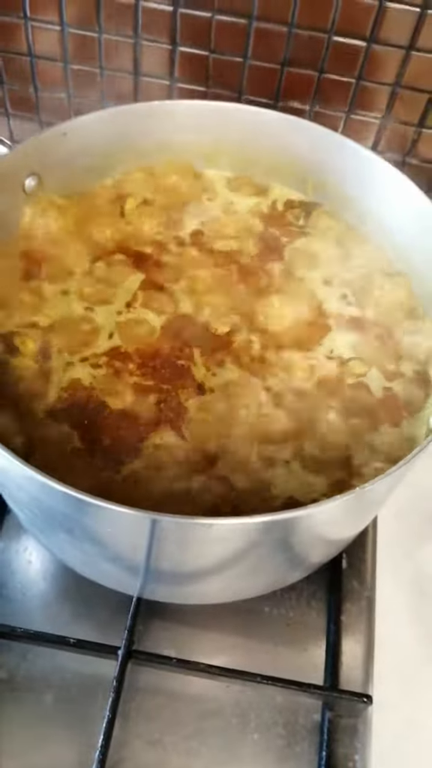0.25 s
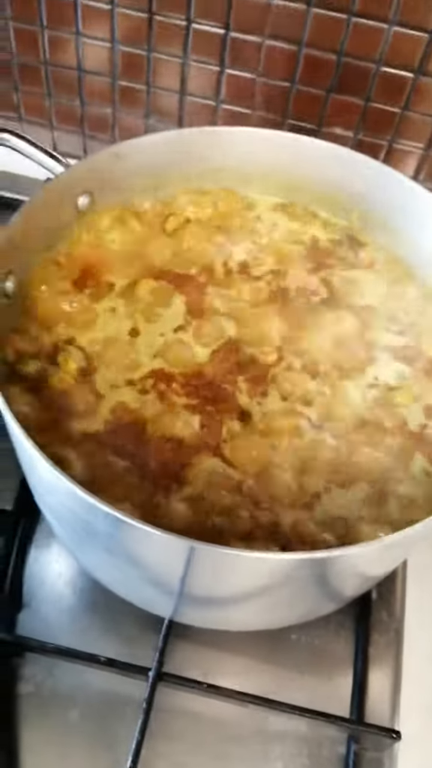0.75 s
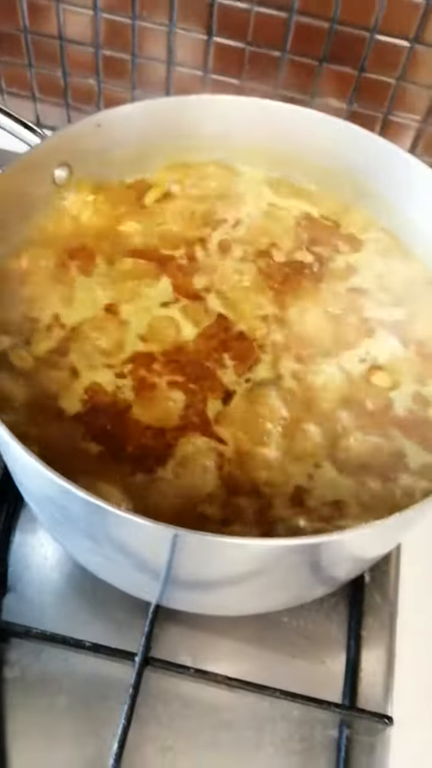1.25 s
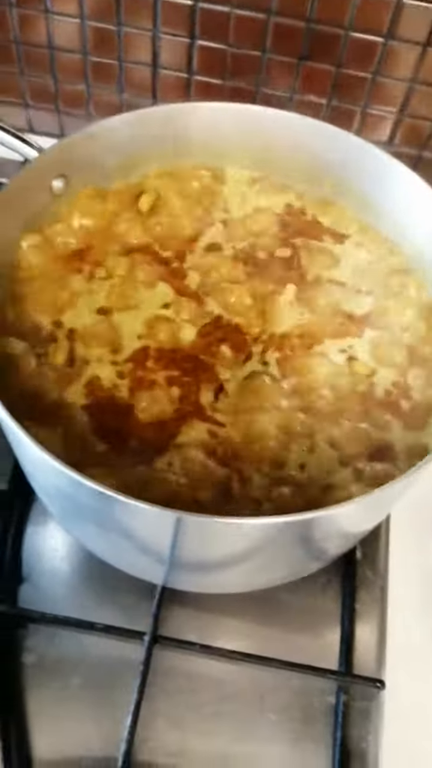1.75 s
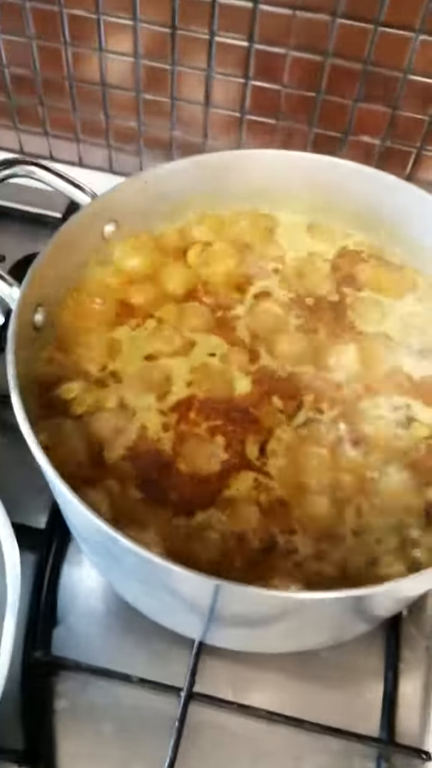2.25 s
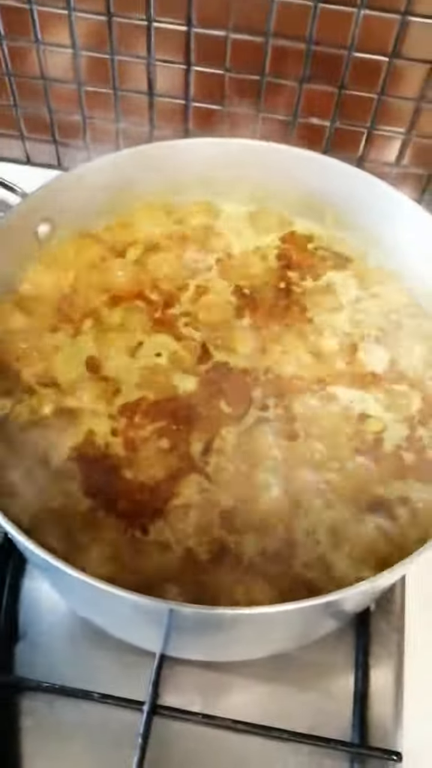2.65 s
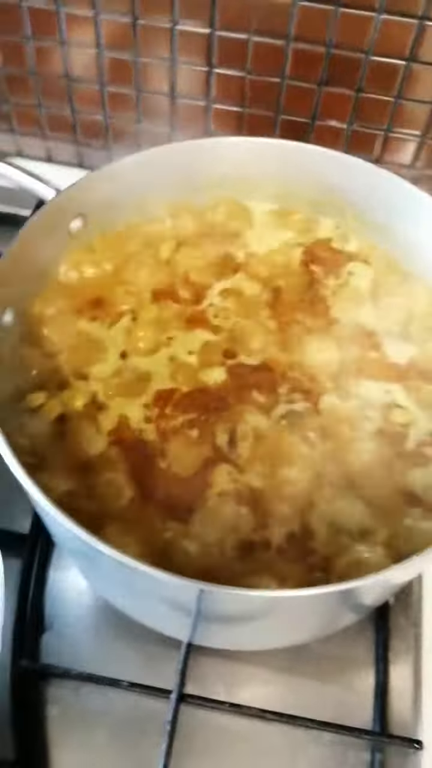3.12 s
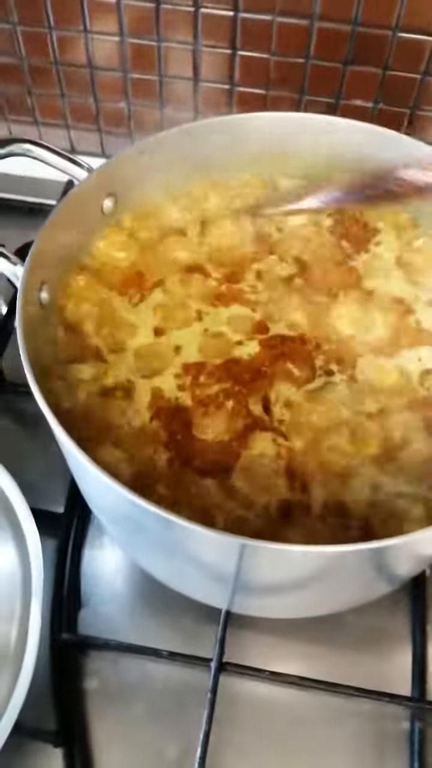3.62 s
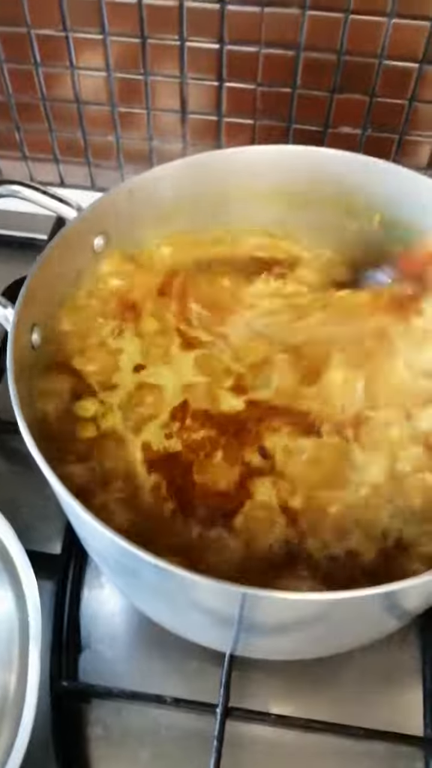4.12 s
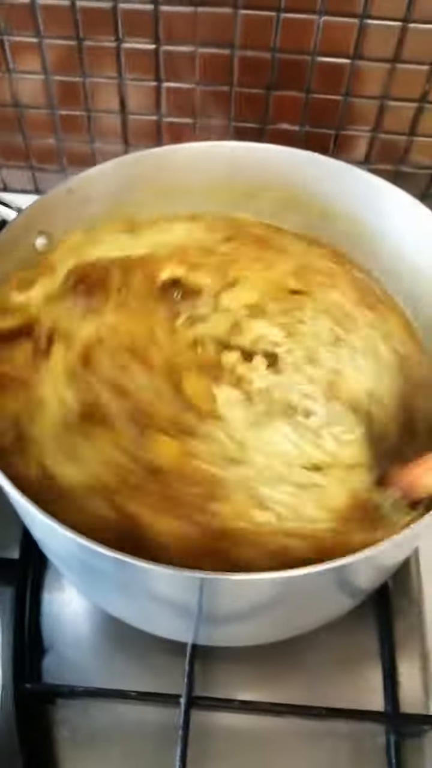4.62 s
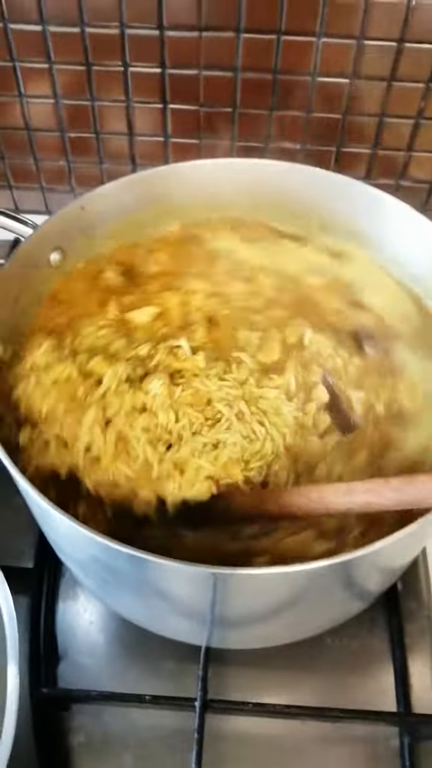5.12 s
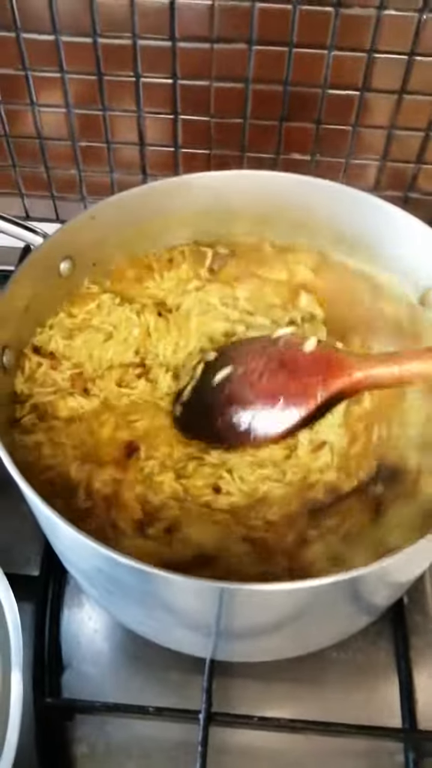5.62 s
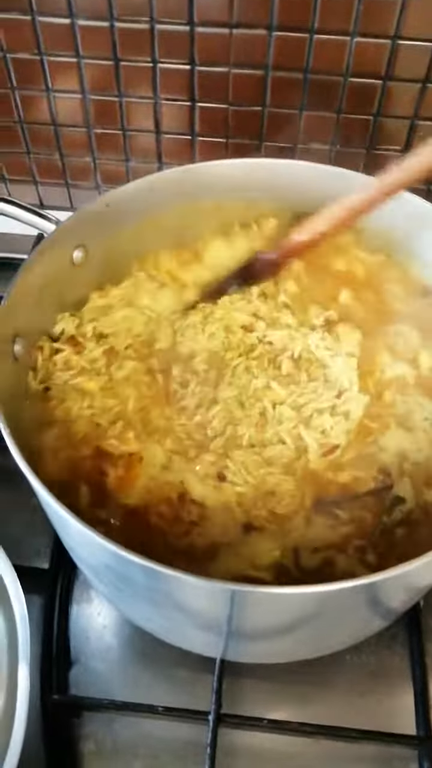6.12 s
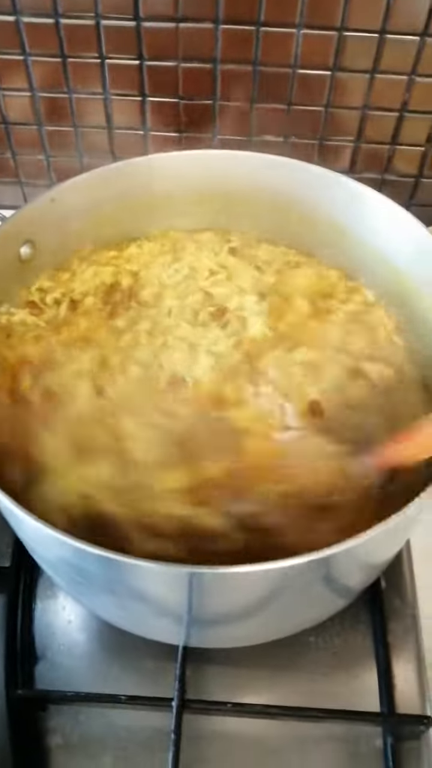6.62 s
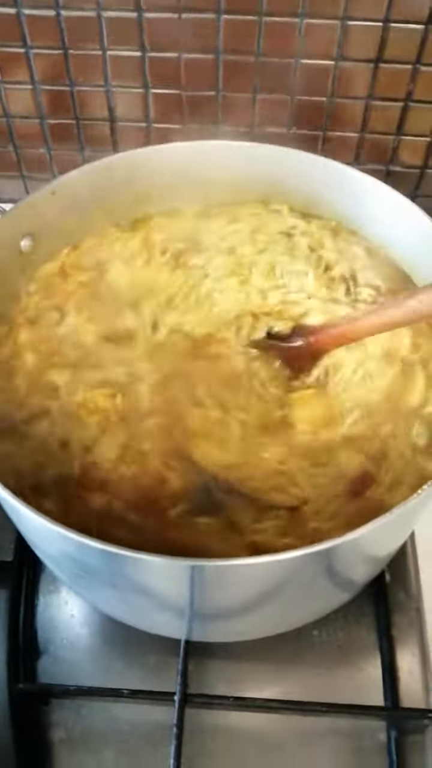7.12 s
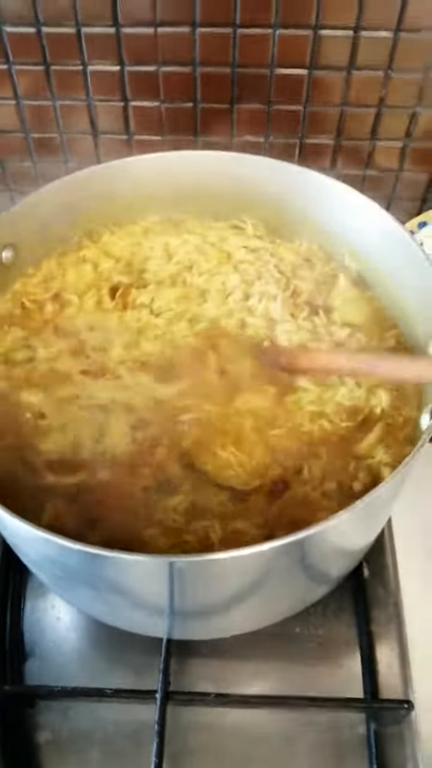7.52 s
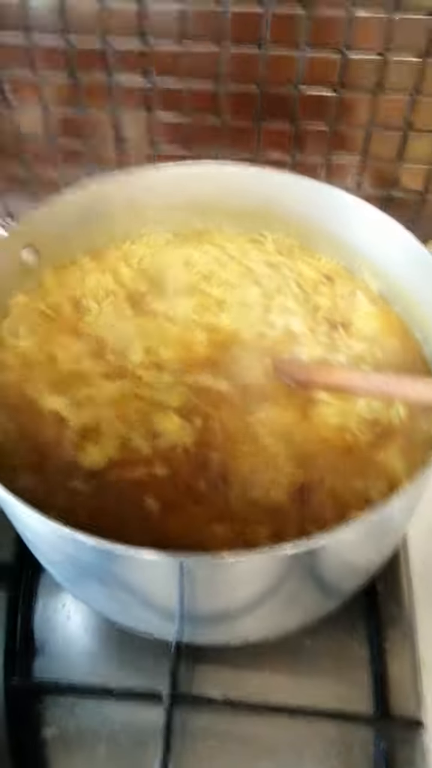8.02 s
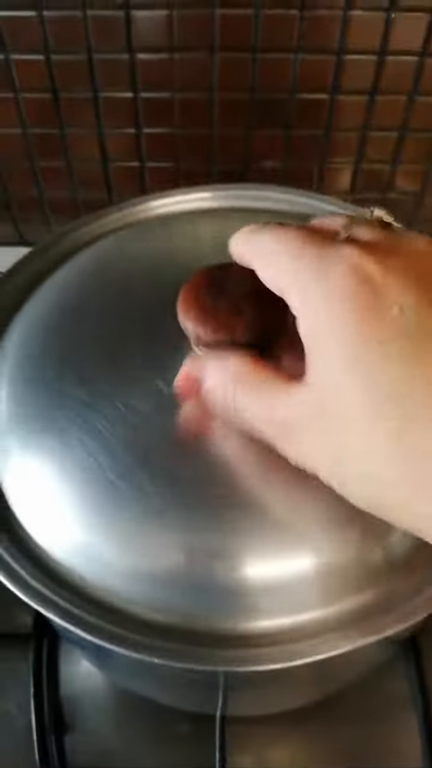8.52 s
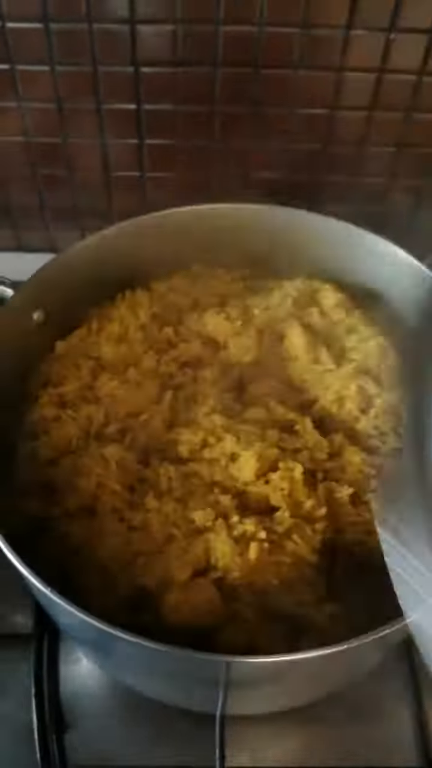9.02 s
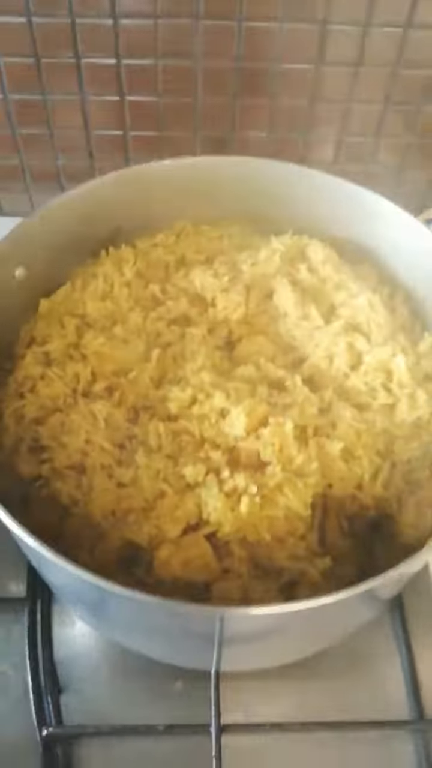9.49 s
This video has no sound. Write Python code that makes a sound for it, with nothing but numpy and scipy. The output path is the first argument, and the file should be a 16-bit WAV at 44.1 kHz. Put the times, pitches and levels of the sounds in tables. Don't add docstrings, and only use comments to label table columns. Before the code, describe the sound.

Close in a tiled kitchen, a pot of rice boils over a low flame rumble with bursting bubbles and bright fizz. An early sharp steel snap and ladle clinks give way to wooden spoon taps, scrapes and wet pops as the big bubbles calm. The sound cuts abruptly to a muffled covered simmer; a hand rattles the lid, lifts it ringing, and steam rushes out.

```python
import sys
import numpy as np
from scipy import signal
from scipy.fft import rfft, irfft, next_fast_len
from scipy.io import wavfile

SR = 44100
rng = np.random.default_rng(int(sys.argv[2]) if len(sys.argv) > 2 else 0)


def boost(x):
    u = np.asarray(x, float) / 20
    return 10 ** u


def output_pcm(signal):
    pcm = np.clip(np.atleast_2d(signal).T, -1, 1) * 32767
    wavfile.write(sys.argv[1], SR, np.round(pcm).astype(np.int16))


N = 429975
HZ = np.maximum(np.fft.rfftfreq(N, 1 / SR), 1)

SCENE_CHANGE_S, TILT_S, LIFT_S = 8.072, 8.6, 8.74

# f/Hz, level/dB per Hz
RUMBLE_SPECTRUM = [(12, -50), (20, -36), (54, 0.5), (108, -5.5), (141, 3.5), (177, -5), (208, -8),
                   (252, -15.5), (284, -1.5), (352, -7), (500, -17.5), (650, -49), (1100, -120)]
# f/Hz, level/dB per Hz
SEETHE_SPECTRUM = [(210, -79), (350, 7.5), (440, -13), (539, 7), (858, 2.5), (920, -5), (1040, 1),
                   (1220, -22), (1600, -12), (2080, -10.5), (3520, -120)]
# f/Hz, level/dB per Hz
FIZZ_SPECTRUM = [(590, -12), (1000, 3), (1730, -18.5), (2590, -4.5), (2870, -11.5), (3190, -8),
                 (3670, -15.5), (5700, -6.5), (6470, 2), (7530, -8), (8550, -20), (9170, -19.5),
                 (13500, -15.5), (14800, -11), (15600, -22)]
# f/Hz, width/Hz, boost/dB
FIZZ_RESONANCES = [(2660, 110, -1), (3150, 100, 5), (5240, 370, 6.5), (6410, 60, 8), (8480, 320, 16),
                   (9470, 400, 3), (10800, 770, 3.5), (12140, 300, 6), (14800, 330, 6)]
# f/Hz, level/dB per Hz
SIMMER_SPECTRUM = [(210, -7), (350, -11), (672, -12), (1120, -15), (1250, -18), (1650, -18.5),
                   (3160, -21.5), (3410, -29), (4500, -21), (5850, -42), (9900, -120)]
# f/Hz, level/dB per Hz
LEAK_SPECTRUM = [(1760, -53), (3000, -25), (3260, 3), (4230, -8), (5480, 3), (6390, -5), (16000, -18)]
# f/Hz, level/dB per Hz
STEAM_SPECTRUM = [(2060, -25), (3500, -13), (3850, -48), (4630, -11), (5860, -5), (6240, -10), (6700, -0.5),
                  (7510, -0.5), (10800, -10), (14700, -5.5), (16000, -9)]
# t/s, level/dB
REACH = [(0.0, -57), (0.43, -57.5), (0.9, -57.5), (1.0, -63.5), (1.2, -61.5), (1.57, -58), (2.0, -52),
         (4.2, -52), (8.06, -52)]
# t/s, left minus right/dB
BROTH_SIDE = [(0.0, 30), (0.62, 34), (0.87, 25), (2.52, -0.5), (2.96, 24), (3.88, 3.5), (8.88, -0.5),
              (9.75, -3)]
RUMBLE_DB, BUBBLE_DB, FIZZ_DB = -3.5, -5, 0
STIR_S, SETTLE_S, CALM_DB, RUMBLE_CALM_DB = 2.7, 3.1, -7, -4
LULL_DB = -4
COVERED_DB, LEAK_DB, FLAME_DB = -68.5, -66, -62
UNCOVERED_DB = 8
STEAM_DB, STEAM_RISE_S, STEAM_THINS_DB_PER_S = -52.5, 0.28, 7.5

# t/s, level/dB, brightness/dB per octave
CLINKS = [
    (0.0, -57, -0.5),
    (1.5415, -30, -7),
    (1.594, -29.5, -10.5),
    (1.623, -36.5, -1),
    (1.767, -37, -16),
    (1.700, -31.5, 2),
    (1.786, -35.5, -7),
]
# f/Hz, level/dB, t60/s
LADLE_MODES = [(2562, 0, .4), (2599, -1, .4), (2690, -16, .08), (3670, -17, .05), (5090, -21, .2),
               (6095, -6, .16), (6580, -2, .22), (6622, -3, .22), (7360, -22, .12), (7950, -13, .1),
               (8990, -10, .2), (9130, -16, .14), (10765, -5, .12), (13145, -12, .12), (14225, -9, .1),
               (14705, -21, .08)]
LADLE_LEAN_DB, LADLE_LAG_S = -5, -.00008
GRIP_S, GRIP_DB = 1.686, -18

# t/s, tap level/dB, tap f/Hz, snap level/dB
RAPS = [(0.069, -57.5, 1940, -68), (0.082, -60.5, 1580, -59.5), (0.8968, -51, 1650, -35.5),
        (1.541, -59, 1940, -45.5), (1.567, -53, 2800, -88), (1.626, -49.5, 2860, -81),
        (1.698, -53, 3650, -36.5), (2.01, -58, 2600, -49), (2.243, -47, 1850, -59), (2.32, -61, 1330, -79),
        (2.411, -47, 1300, -42), (2.4153, -47, 4760, -39.5), (2.557, -49, 1840, -84),
        (2.558, -44.5, 3000, -62), (2.566, -50, 2360, -83), (2.898, -57.5, 1710, -79),
        (7.535, -66, 2300, -88), (8.392, -50, 1630, -35), (8.404, -48, 1960, -34), (2.958, -62, 2500, -97),
        (8.613, -58, 1800, -54), (8.645, -63, 3300, -52),
        (3.93, -61.5, 1330, -71), (4.237, -59, 1340, -82), (4.883, -57, 2140, -59), (4.944, -58, 2520, -55),
        (5.18, -53, 1900, -56), (5.773, -51, 3060, -87), (5.892, -79, 2330, -55), (3.467, -53.5, 2570, -76),
        (6.381, -57.5, 1950, -55), (6.419, -56, 3150, -72), (6.506, -51.5, 2820, -62),
        (6.517, -53.5, 1130, -54), (6.628, -56, 2360, -58), (6.7, -61, 2800, -51),
        (6.809, -56.5, 2660, -92), (6.942, -52, 2800, -88), (7.484, -50, 2360, -84),
        (7.632, -85, 2460, -53), (7.75, -53.5, 2140, -55), (7.836, -57, 1930, -51),
        (7.869, -61, 3530, -49.5), (7.987, -67, 2400, -45)]
# pitch ratio/1, level/dB
SPOON_PARTIALS = [(.62, 2.5), (.8, -12), (1, 19.5), (1.06, 5), (1.27, 10.5), (1.6, 7.5), (2.1, -22)]
# f/Hz, level/dB
SNAP_PARTIALS = [(4700, -10), (5400, -4), (5900, -1), (6400, -3), (6850, 0), (7350, 0), (7900, -7),
                 (8500, -14), (9600, -22), (11200, -24), (13500, -25)]
SNAP_T60_S = .011

# t/s, level/dB, f/Hz
PLOPS = [(0.08, -52, 920), (0.163, -56.5, 786), (0.214, -46, 1085), (0.271, -69, 880), (0.326, -49.5, 810),
         (0.536, -54, 785), (0.588, -52.5, 830), (0.669, -51, 770), (1.379, -46.5, 900), (2.011, -43, 865),
         (2.32, -41, 710), (2.69, -47, 927), (2.862, -42.5, 630), (3.198, -54, 810), (4.271, -47, 1320),
         (4.946, -39.5, 900), (4.966, -43.5, 1050), (5.702, -55, 1050), (5.771, -45, 1090),
         (6.515, -58, 1090), (6.631, -50.5, 610), (7.072, -45.5, 890), (7.87, -46, 1110),
         (7.984, -46, 1090), (9.694, -45.5, 1180)]
# t/s, level/dB, f/Hz
THUMPS = [(0.8957, -53, 324), (1.542, -50, 424), (1.7, -47, 418), (2.412, -38, 540), (2.4151, -30.5, 806),
          (2.56, -39, 990), (2.92, -46.5, 170), (3.754, -35, 600), (3.79, -45, 586), (6.382, -46, 305),
          (7.483, -24.5, 306), (7.486, -29.5, 556), (7.535, -43, 180), (7.534, -33, 950), (8.186, -38, 915),
          (8.345, -44, 282), (8.393, -32.5, 299), (8.407, -28.5, 883), (8.503, -45, 335), (8.593, -41, 211),
          (8.612, -32, 330), (9.088, -49, 1010), (9.052, -45, 343), (9.177, -44, 174)]
# t/s, peak level/dB, f/Hz, t60/s
POPS_AND_BUMPS = [(0.176, -44.5, 890, 0.038), (0.243, -49, 860, 0.025), (0.272, -49, 1570, 0.032),
                  (0.292, -53, 1550, .02), (0.315, -51, 806, .03), (0.354, -46, 2510, 0.014), (0.448, -54, 650, .03),
                  (0.539, -48, 1860, .015), (0.612, -49, 800, .03), (1.4805, -51, 1330, 0.044),
                  (1.996, -45, 1600, 0.038), (2.3675, -48, 1210, 0.022), (2.382, -41, 1060, .02),
                  (2.691, -45, 1320, .02), (2.753, -44, 1300, .02), (2.865, -43, 1180, .02),
                  (2.898, -41, 1340, 0.024), (2.958, -40.5, 1650, 0.018), (3.118, -47, 1600, 0.029),
                  (3.2357, -40.5, 2480, .015), (3.4865, -47, 2600, .015), (3.57, -45, 1300, 0.022),
                  (3.723, -45, 1010, .03), (3.754, -34.5, 610, 0.047), (3.755, -37.5, 354, 0.068),
                  (3.769, -40, 620, .04), (3.796, -41, 450, .04), (3.818, -40, 328, 0.062), (4.627, -45, 113, .2),
                  (4.624, -45, 320, 0.066), (4.903, -44, 2010, .02), (5.167, -45, 2020, .015),
                  (5.754, -54, 2600, 0.014), (5.805, -43, 3020, .015), (5.842, -37.5, 3200, 0.017),
                  (5.976, -46.5, 1350, 0.054), (6.398, -43, 1300, .02), (6.445, -42, 288, 0.12),
                  (6.497, -41, 2700, .015), (6.507, -40, 1230, 0.023), (6.661, -44, 1810, .015),
                  (6.677, -40, 2900, .015), (6.695, -38, 2780, .02), (6.727, -47, 2080, .015),
                  (6.77, -43, 2680, 0.02), (6.899, -43, 3170, .015), (7.7516, -21.5, 2590, 0.017),
                  (7.764, -37, 2160, .02), (8.187, -43, 1650, 0.017), (8.41, -23, 1810, 0.018),
                  (0.898, -20, 5800, .02), (0.898, -21.5, 6900, 0.03), (0.898, -25, 7630, .022),
         (0.897, -37, 2610, 0.054), (2.565, -44, 2360, .15), (3.2, -41.5, 825, 0.034),
         (5.705, -44, 1025, 0.037), (8.395, -36, 266, 0.12), (0.896, -44, 154, 0.067),
         (0.895, -39.5, 337, 0.026), (0.912, -43, 347, 0.045), (0.929, -53, 363, 0.16),
         (0.897, -42, 1710, .015), (2.402, -39, 800, 0.025), (2.43, -42, 326, 0.09),
         (4.238, -53, 1380, 0.019), (4.267, -45, 1300, 0.031), (4.414, -44.5, 820, 0.038),
         (4.44, -47.5, 1170, .03), (4.665, -48, 1980, 0.039), (7.536, -34.5, 417, 0.027),
         (7.562, -41.5, 386, .12), (7.75, -32.5, 2010, .015), (8.394, -23, 374, 0.0081),
         (8.396, -29, 1710, 0.02), (8.4056, -20.5, 1820, 0.015), (8.406, -26.5, 950, 0.025),
         (8.418, -27, 2140, 0.045), (8.425, -43, 350, 0.027), (8.595, -48, 950, 0.034),
         (8.596, -48, 1610, .03), (8.612, -38, 920, 0.027), (8.622, -42.5, 657, 0.046),
         (8.64, -39, 880, 0.022), (8.639, -41, 1600, .02), (8.64, -41, 304, 0.038),
         (0.898, -42, 14900, .03), (7.54, -34.5, 153, 0.18), (7.486, -46, 1024, 0.36),
         (0.166, -49, 800, 0.028), (4.801, -34, 3730, .008), (5.067, -43, 2700, 0.014)]
POP_RISE_CYCLES, POP_CLIMB = 1.7, 0.017

# t/s, level/dB, t60/s
WASHES = [
    (0.897, -30, .03),
    (0.9, -40, .3),
    (2.416, -48, .15),
    (8.41, -38, .3),
]
WASH_LOW_HZ, WASH_HIGH_HZ = 5600, 8400

# t/s, rise/s, hold/s, level/dB
SHIVERS = [
    (2.25, .004, 0.05, -52),
    (2.42, 0.003, 0.047, -45.5),
    (2.562, 0.0033, 0.17, -47),
    (6.49, 0.0098, 0.021, -54),
    (6.63, .01, 0.059, -54),
    (7.755, 0.0049, 0.14, -49),
    (8.31, 0.0039, 0.093, -59.5),
]
# f/Hz, level/dB, t60/s
WALL_MODES = [(1250, -8.5, 0.057), (1860, 0, 0.022), (2010, 1.5, 0.026), (2360, 1, 0.025), (2660, -20, .04),
              (3000, -14, .03), (3260, -13, 0.023), (5300, -22, .02)]
SHIVER_SAG_DB_PER_S = 70

# t/s, rise/s, hold/s, level/dB, brightness/dB per octave
DRAGS = [
    (3.767, 0.0036, 0.056, -39, 4),
    (4.572, 0.061, 0.13, -38, -2),
    (6.367, 0.0079, 0.052, -40.5, -1),
    (6.408, .03, 0.027, -44.5, 2),
    (7.488, 0.0045, 0.06, -38, -9),
]
# f/Hz, width/Hz, level/dB
BOTTOM_MODES = [(168, 13, 3.5), (305, 35, 3.5), (614, 520, -5)]
DRAG_SAG_DB_PER_S = 107

# t/s, rise/s, hold/s, level/dB
GURGLES = [
    (8.085, 0.0041, 0.041, -60),
    (8.19, .005, 0.078, -65),
    (8.8, 0.016, 0.142, -51.5),
]
HOLLOW_HZ, HOLLOW_WIDTH_HZ = 582, 63

# t/s, level/dB, brightness/dB per octave
KNOB_BLOWS = [
    (8.311, -50, 4),
    (8.328, -55, 1),
    (8.346, -54, -2),
]
# f/Hz, level/dB, t60/s
KNOB_MODES = [(2360, -2, 0.07), (1950, -6, .03), (3300, -6, .15), (8950, -17, 0.04), (5416, -16, 0.06),
              (5895, -14, 0.05), (7340, -8, 0.07)]

# t/s, rise/s, hold/s, level/dB
RATTLES = [
    (8.3932, 0.0011, 0.21, -30.5),
    (8.595, 0.024, 0.12, -47),
]
# f/Hz, level/dB per Hz
RATTLE_SPECTRUM = [(88, -37), (150, -7), (362, -3), (1160, -6), (1370, -12), (2180, -7), (3770, -11.5),
                   (6810, -3.5), (9000, -34), (15500, -35)]
# t/s, level/dB, brightness/dB per octave
CLANGS = [
    (8.3936, -34, 3.5),
    (8.4061, -24.5, -2.5),
    (8.6151, -39, -6),
    (8.6425, -40, -3),
]
# f/Hz, level/dB, t60/s
RIM_MODES = [(3130, -16.5, 0.097), (3600, -23, .18), (5416, -25, 0.22), (5970, -13, 0.17),
             (6360, -18, 0.29), (6830, -12, .12), (7390, -4.5, 0.095), (9350, -20, 0.06),
             (10920, -16, 0.066), (11160, -21, 0.063), (12500, -20, .1), (13830, -27, .087),
             (15000, -16, .076)]
RATTLE_SAG_DB_PER_S = 217

# t/s, level/dB, brightness/dB per octave
LID_BLOWS = [
    (8.615, -52.5, 0),
    (8.643, -41, 3),
]
# f/Hz, level/dB, t60/s
LID_MODES = [(1357, -14, 2.2), (1432, -13, 3.0), (2406, -17, 2.5), (2570, -22, .45), (3268, -7, .16),
             (3332, -5, .16), (3402, -16, .29), (4716, -12, .15), (6250, -16, .2), (7150, -12, .1)]
LID_LEAN_DB, LID_LAG_S = -5, .00001
TURN_S, TURN_LOW_DB, TURN_HIGH_DB = 8.92, -9, -34

RELEASE_S = 0.034
KITCHEN_T60_S, WALL_CUT_HZ, KITCHEN_DB = 0.59, 5660, -13
TILE_HZ, DULL_ECHO_DB = 3800, -4

# f/Hz, correlation/1
LIKENESS = [(30, 0.81), (200, 1), (400, 0.73), (650, 0.031), (1050, 1), (1500, 0.028), (2800, 0.042),
            (4200, 0.026), (5600, 0.028), (6400, 0.54), (7300, 0.12), (16000, 0.081)]
# f/Hz, left minus right/dB
PORT_LEAN = [(60, -4), (92, -1), (140, -1), (210, -6.5), (330, -1), (500, -7), (770, 3), (1170, -1),
             (1790, -3), (2740, -6.5), (4190, -5.5), (6410, -2.5), (9810, 7.5), (15000, -1)]
BOIL_LAG_S, BLOW_LAG_S = 0.00017, .000135


def rms_one(x):
    return x / np.sqrt(np.mean(x ** 2) + 1e-20)


def above(x, hz):
    return signal.sosfilt(signal.butter(2, hz, "high", fs=SR, output="sos"), x)


def below(x, hz):
    return signal.sosfilt(signal.butter(4, hz, "low", fs=SR, output="sos"), x)


def at_hz(points, hz):
    table_hz, values = np.transpose(points)
    return np.interp(np.log(hz), np.log(table_hz), values)


def in_time(points):
    return np.interp(np.arange(N) / SR, *np.transpose(points))


def ramp(start_s, length_s):
    return np.clip((np.arange(N) / SR - start_s) / length_s, 0, 1)


def strokes(rows, sag_db_per_s):
    t, out = np.arange(N) / SR, 0
    for s, rise_s, hold_s, db in rows:
        corners_s = np.cumsum([s, rise_s, hold_s, RELEASE_S])
        corners_db = db - np.cumsum([15, -15, sag_db_per_s * hold_s, 20])
        out = out + boost(np.interp(t, corners_s, corners_db, left=-200, right=-200))
    return out


def drift(rate_hz):
    steps = rng.standard_normal(N // 200 + 2)
    r = np.exp(-400 * np.pi * rate_hz / SR)
    slow = rms_one(signal.lfilter([1], [1, -2 * r, r * r], steps))
    return np.interp(np.arange(N) / 200, np.arange(len(steps)), slow)


def grains(per_s, spread_db):
    sizes = boost(spread_db * np.minimum(rng.exponential(1, N), 5)) * rng.choice([-1, 1], N)
    return rms_one(sizes * (rng.random(N) < per_s / SR))


def ring(clicks, hz, t60_s):
    r, w = boost(-60 / (t60_s * SR)), 2 * np.pi * hz / SR
    return signal.lfilter([.5, 0, -.5], [1, -2 * r * np.cos(w), r * r], clicks + 1e-18)


def touches(luck):
    t = np.arange(900) / SR
    chatter = luck[:900] ** 3 * (np.exp(-t / .0025) + .2 * np.exp(-t / .008))
    return np.pad(chatter / np.abs(chatter).max() + 1.3 * (t == 0), (0, 7100))


def add(out, s, db, sound):
    i = round((s + 0.002) * SR)
    out[..., i:i + len(sound)] += np.multiply.outer(boost(db), sound / np.abs(sound).max())


def struck(blows, modes, swell_s):
    s, blow_db, bright_db = np.transpose(blows)
    out, luck = np.zeros(N), rng.standard_normal((len(blows), len(modes)))
    for k, (hz, db, t60_s) in enumerate(modes):
        clicks = np.zeros(N)
        octaves = np.log2(hz / modes[0][0])
        clicks[(s * SR).astype(int)] = boost(blow_db + db + bright_db * octaves + .5 * luck[:, k])
        tone = ring(clicks, hz, t60_s) - ring(clicks, hz, swell_s)
        out += tone * boost(2.2 * drift(35)) * (-1) ** k
    return out


def sides(lean_db):
    return boost(np.array([lean_db / 2, -lean_db / 2]))


def later_right(x, lag_s):
    return irfft(rfft(x) * np.exp(-2j * np.pi * HZ * np.array([[0], [lag_s]])), N)


def placed(x, lean_db, lag_s):
    return sides(lean_db)[:, None] * later_right(x, lag_s - BLOW_LAG_S)


def spread(make, colour_db):
    alike = np.clip(at_hz(LIKENESS, HZ), 0, 1)
    shared, own = rfft(make()), rfft(np.array([make(), make()]))
    mixed = np.sqrt(alike) * shared + np.sqrt(1 - alike) * own
    return rms_one(irfft(boost(colour_db) * mixed, N))


def hiss(spectrum, flicker_db, crackle=0., per_s=100., boost_db=0):
    def make():
        return rng.standard_normal(N) + crackle * grains(per_s, 3.9)
    return spread(make, at_hz(spectrum, HZ) + boost_db) * boost(flicker_db * drift(16.1))


def bubbles(per_s, cycles, low_hz, high_hz):
    born = grains(per_s * boost(5.2 * drift(5)), 2.4)
    dealt = rng.integers(0, 14, N)
    pitches_hz = np.geomspace(low_hz, high_hz, 14)
    rings = sum(ring(born * (dealt == k), hz, cycles / hz) for k, hz in enumerate(pitches_hz))
    return rms_one(below(rings, 1.32 * high_hz))


def flame_rumble(opened, lifted, reach_db, stirred):
    lull = ramp(1.5, 0.053) - ramp(1.88, .08)
    open_db = reach_db + RUMBLE_DB + RUMBLE_CALM_DB * stirred + LULL_DB * lull
    return hiss(RUMBLE_SPECTRUM, 3.0) * boost(np.where(opened > 0, open_db, FLAME_DB + 2.0 * lifted))


def seething_broth(stirred):
    broth = hiss(SEETHE_SPECTRUM, 4.2) + 0.55 * bubbles(150, 12.0, low_hz=490, high_hz=1250)
    return broth * sides(0.34 * in_time(BROTH_SIDE)) * boost(BUBBLE_DB + CALM_DB * stirred)


def fizz():
    resonance_db = sum(db / (1 + (2 * (HZ - hz) / width_hz) ** 2) for hz, width_hz, db in FIZZ_RESONANCES)
    small = hiss(FIZZ_SPECTRUM, 1.34, crackle=0.57, per_s=300, boost_db=resonance_db)
    return boost(FIZZ_DB) * (small + 0.15 * bubbles(70, 14.0, low_hz=1300, high_hz=3300))


def covered_simmer():
    return boost(COVERED_DB + UNCOVERED_DB * ramp(TILT_S, .03)) * hiss(SIMMER_SPECTRUM, 1.5)


def steam(lifted):
    rise_db = -5 * (1 - ramp(LIFT_S, STEAM_RISE_S))
    thinning_db = STEAM_THINS_DB_PER_S * ramp(LIFT_S + STEAM_RISE_S, 1)
    rush = boost(STEAM_DB + rise_db - thinning_db) * hiss(STEAM_SPECTRUM, 1.0, crackle=0.81, per_s=780)
    leak = boost(LEAK_DB) * hiss(LEAK_SPECTRUM, 0.43)
    return lifted * rush + (1 - lifted) * leak


def boil():
    reach_db, stirred = in_time(REACH), ramp(STIR_S, SETTLE_S)
    opened, lifted = 1 - ramp(SCENE_CHANGE_S - .004, .004), ramp(LIFT_S, 0.075)
    uncovered = boost(reach_db) * (seething_broth(stirred) + fizz())
    covered = covered_simmer() + steam(lifted)
    return flame_rumble(opened, lifted, reach_db, stirred) + opened * uncovered + (1 - opened) * covered


def ladle():
    tone = struck(CLINKS, LADLE_MODES, 0.00059) * boost(GRIP_DB * ramp(GRIP_S, 0.19))
    dulled = ramp(1.59, RELEASE_S) - ramp(GRIP_S - RELEASE_S, RELEASE_S)
    tone = (1 - dulled) * tone + dulled * below(below(tone, 10500), 10500)
    lows = placed(below(tone, TILE_HZ), LADLE_LEAN_DB, LADLE_LAG_S)
    return lows + above(above(tone, TILE_HZ), TILE_HZ)


def knocks():
    out, rows = np.zeros(N + 8000), RAPS
    for (s, tap_db, tap_hz, snap_db), luck in zip(rows, rng.standard_normal((len(rows), 930))):
        touch = touches(luck)
        tap = sum(boost(db + 2 * g) * ring(touch, tap_hz * ratio, 22.0 / tap_hz)
                  for (ratio, db), g in zip(SPOON_PARTIALS, luck[900:]))
        snap = sum(boost(db + 2 * g) * ring(touch, hz, SNAP_T60_S)
                   for (hz, db), g in zip(SNAP_PARTIALS, luck[910:]))
        hardness = np.clip(1.6 + .04 * (snap_db - tap_db + 20), 1.12, 3)
        add(out, s, tap_db + 20.0, below(above(tap, 0.84 * tap_hz), hardness * tap_hz))
        add(out, s, snap_db + 15.5, above(snap, 3600))
    return out[:N]


def thuds():
    out, rows = np.zeros((2, N + 8000)), [*PLOPS, *THUMPS]
    partials = [(.5, -6), (1, 0), (1.8, -5), (3.1, -9)]
    for k, (s, db, hz) in enumerate(rows):
        touch = touches(rng.standard_normal(900))
        low_hz, top_ratio = (0.74 * hz, 1.5) if k < len(PLOPS) else (56, 2.96)
        thud = sum(boost(part_db) * ring(touch, hz * ratio, 22.0 / hz / ratio) for ratio, part_db in partials)
        lean_db = 0.33 * np.interp(s, *np.transpose(BROTH_SIDE)) * np.array([1, -1])
        add(out, s, db + 0.5 + lean_db, below(above(thud, low_hz), top_ratio * hz))
    return out[:, :N]


def pops():
    out, t, rows = np.zeros(N + 8000), np.arange(8000) / SR, POPS_AND_BUMPS
    for (s, db, hz, t60_s), turn in zip(rows, rng.random(len(rows))):
        swell = 1 - np.exp(-(t * hz / POP_RISE_CYCLES) ** 2 * 3)
        climb = 1 + POP_CLIMB * np.minimum(t / t60_s, 1)
        tone = np.sin(2 * np.pi * (turn + hz * t * climb))
        add(out, s - .003, db, swell * boost(-60 * t / t60_s) * tone)
    return out[:N]


def washes():
    t = np.arange(N) / SR
    noise = below(below(rng.standard_normal((2, N)), WASH_HIGH_HZ), WASH_HIGH_HZ)
    noise = rms_one(above(above(noise, WASH_LOW_HZ), WASH_LOW_HZ))
    return noise * sum((t >= s) * boost(db - 60 * np.maximum(t - s, 0) / t60_s) for s, db, t60_s in WASHES)


def shivers():
    slips = grains(1400, 1.9)
    wall = sum(boost(db) * ring(slips, hz, 0.69 * t60_s) for hz, db, t60_s in WALL_MODES)
    return strokes(SHIVERS, SHIVER_SAG_DB_PER_S) * rms_one(wall)


def drags():
    slips, out = grains(900, 1.0), np.zeros(N)
    for hz, width_hz, mode_db in BOTTOM_MODES:
        octaves = np.log2(hz / BOTTOM_MODES[1][0])
        rows = [(s, rise_s, hold_s, db + mode_db + bright_db * octaves)
                for s, rise_s, hold_s, db, bright_db in DRAGS]
        out += strokes(rows, DRAG_SAG_DB_PER_S) * rms_one(ring(slips, hz, 2.5 / width_hz))
    return boost(-16.0) * out


def gurgles():
    hollow = ring(grains(900, 1.3), HOLLOW_HZ, 1.9 / HOLLOW_WIDTH_HZ)
    return strokes(GURGLES, 76) * rms_one(below(hollow, 1300))


def knob():
    return struck(KNOB_BLOWS, KNOB_MODES, 0.0015)


def rattle():
    stroke = strokes(RATTLES, RATTLE_SAG_DB_PER_S)
    crash = spread(lambda: grains(2500, 1.0), at_hz(RATTLE_SPECTRUM, HZ))
    contacts = stroke * grains(760, 3.0)
    rings = sum(boost(db) * ring(contacts, hz, np.clip(t60_s, .05, .15)) for hz, db, t60_s in RIM_MODES)
    return boost(2.0) * stroke * crash + boost(-41) * rings


def clangs():
    return struck(CLANGS, RIM_MODES, .0004)


def lid():
    tone = struck(LID_BLOWS, LID_MODES, 0.038)
    lows = below(tone, 1860) * boost(TURN_LOW_DB * ramp(TURN_S + 0.18, 0.17))
    highs = above(above(tone, 1800), 1800) * boost(TURN_HIGH_DB * ramp(TURN_S, .15))
    return placed(lows + highs, LID_LEAN_DB, LID_LAG_S)


def kitchen(x):
    size = next_fast_len(N + SR)
    w = 2 * np.pi * np.fft.rfftfreq(size)
    dull = 1 / (1 + 1j * w * SR / (2 * np.pi * WALL_CUT_HZ))
    tails = np.zeros((2, len(w)), complex)
    for k, lag in enumerate(rng.uniform(.007, .03, 16) * SR):
        loss = boost(-60 * lag / SR / KITCHEN_T60_S)
        loop = loss * dull ** 0.87 * np.exp(-1j * w * round(lag))
        tails[k % 2] += loop / (1 - loop) * (-1) ** (k // 2)
    return irfft(tails * rfft(x, size), size)[:, :N]


def scene():
    blows = thuds() + knocks() + ladle() + lid() + knob() + drags()
    sent = blows.mean(axis=0)
    echo = boost(KITCHEN_DB) * kitchen(boost(DULL_ECHO_DB) * sent + above(sent, TILE_HZ))
    near = later_right(boil(), BOIL_LAG_S) + later_right(blows + rattle() + gurgles(), BLOW_LAG_S)
    small = later_right(shivers() + pops(), BLOW_LAG_S)
    return near + echo + small + washes() + later_right(clangs(), LID_LAG_S)


def roll_off(x):
    return signal.sosfilt(signal.butter(12, 15780, fs=SR, output="sos"), x)


def record(dry):
    ports = irfft(rfft(dry) * sides(at_hz(PORT_LEAN, HZ)), N)
    return roll_off(ports)


dry = scene()
out = record(dry)
output_pcm(out)
```